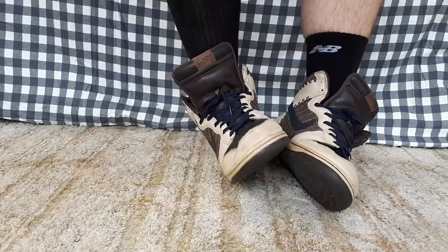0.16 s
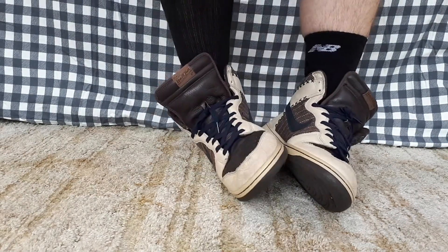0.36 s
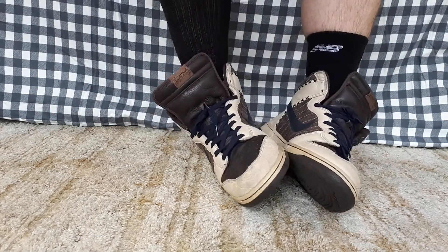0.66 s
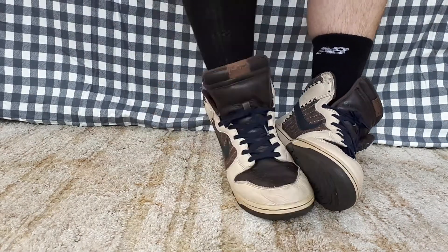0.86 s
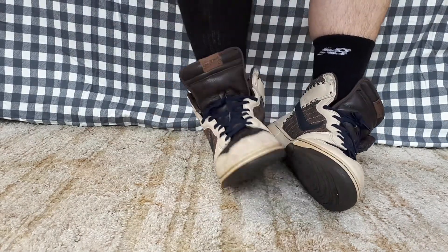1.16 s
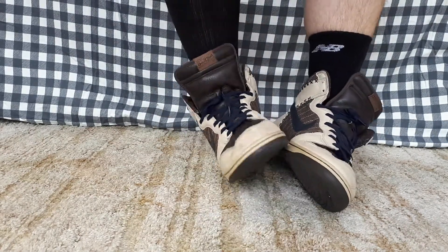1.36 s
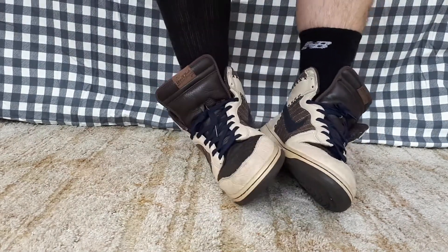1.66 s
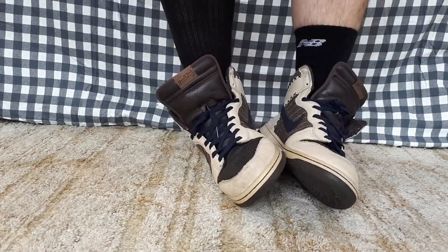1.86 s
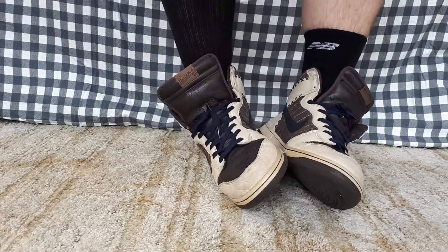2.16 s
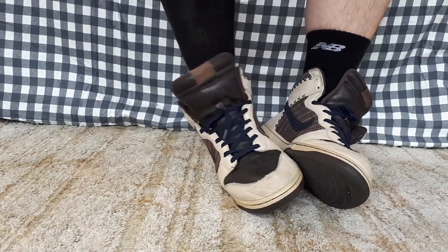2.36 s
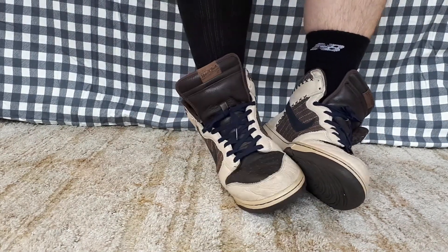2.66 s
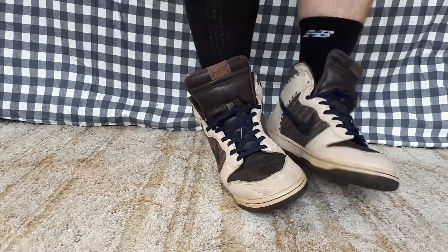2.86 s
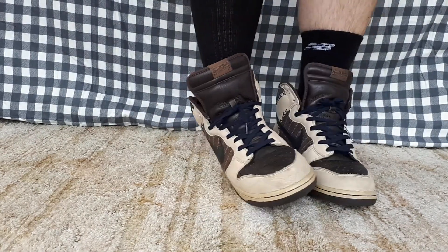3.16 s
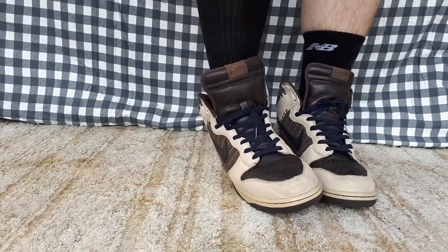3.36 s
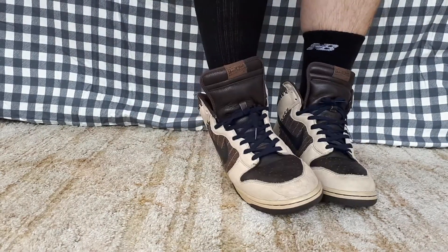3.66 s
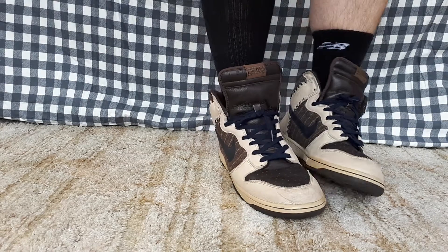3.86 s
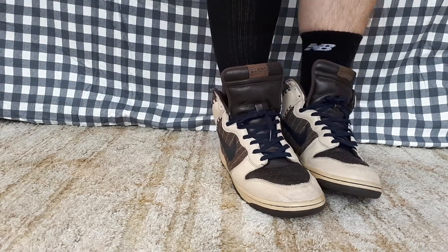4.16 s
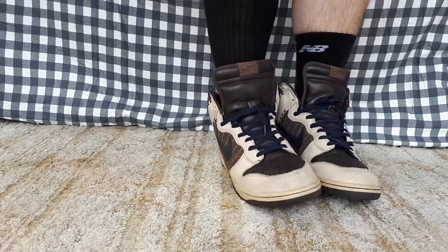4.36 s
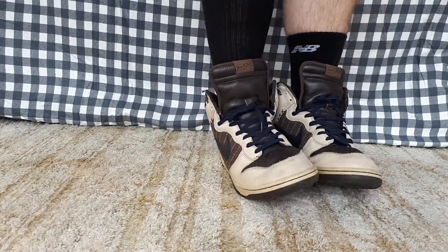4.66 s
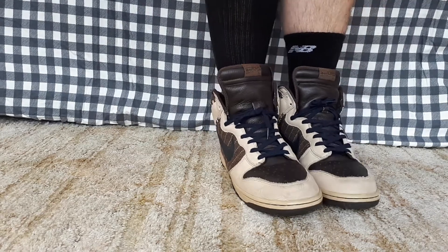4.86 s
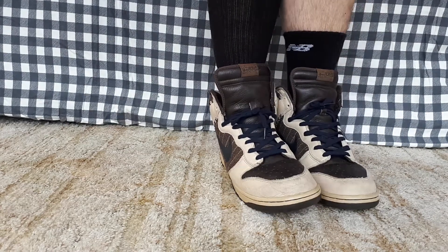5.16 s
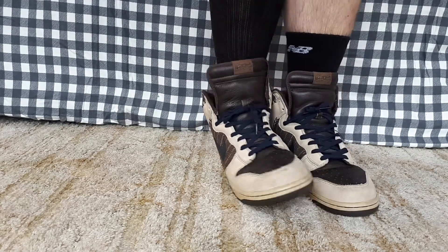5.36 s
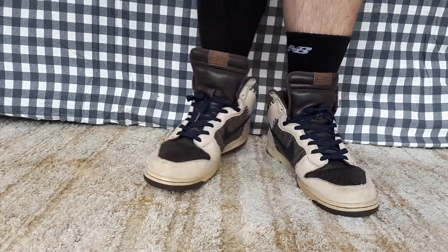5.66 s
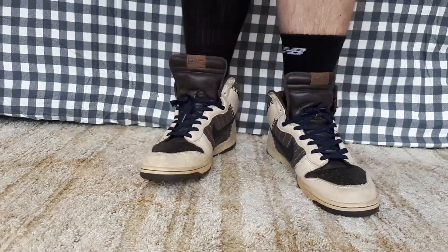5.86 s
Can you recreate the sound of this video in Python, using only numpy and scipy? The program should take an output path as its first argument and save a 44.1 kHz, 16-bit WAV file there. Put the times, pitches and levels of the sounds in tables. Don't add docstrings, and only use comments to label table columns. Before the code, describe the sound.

In a quiet small room with low hum and faint hiss, a soft toe tap on carpet comes first, then a loud hollow sneaker knock with a quick bounce. Faint taps and leather rubbing follow, then a second hard knock, a third duller cluster, and small taps. It ends with soft sole brushing. Close microphone, low by the floor, short room echo.

```python
import sys
import numpy as np
from scipy import signal
from scipy.fft import rfft, irfft
from scipy.io import wavfile
from scipy.ndimage import uniform_filter1d

SR = 44100
rng = np.random.default_rng(int(sys.argv[2]) if len(sys.argv) > 2 else 0)


def master(y):
    cut = np.clip(np.atleast_2d(y).T, -1, 1)
    pcm = np.round(cut * 32767)
    wavfile.write(sys.argv[1], SR, pcm.astype(np.int16))


def elevation(decibels):
    levels = np.asarray(decibels, float)
    return 10 ** (levels / 20)


N = 265430

# (frequency [Hz], density [dB per Hz])
HUM_COLOUR = [(15, -44), (25, -15.5), (84, -2), (117, -4), (206, -8), (277, -18.5), (416, -23.5),
              (734, -24), (840, -27.5), (1190, -29.5), (2220, -35), (2760, -37), (8830, -45),
              (14800, -39.5), (16000, -50)]
# (frequency [Hz], likeness [0-1])
HUM_LIKENESS = [(60, 0.8), (130, 0.96), (290, 0.71), (640, 0.5), (1410, 0), (3100, 0), (6820, -0.09),
                (15000, 0.14)]
# (time [s], level [dB])
RUMBLE_LEVEL = [(0.0, -59), (0.69, -60.5), (0.84, -48), (0.94, -57), (1.19, -58), (1.46, -60.5),
                (2.18, -61.5), (2.97, -61), (3.19, -59), (3.4, -62.5), (3.801, -60.5), (4.2, -61),
                (4.84, -59.5), (5.5, -62), (6.02, -61.5)]
HUM_DB = -59.5

# (time [s], length [s], pitch [Hz], level [dB])
COLLAR_GROANS = [
    (0.197, 0.1, 414.7, -63),
    (0.632, 0.11, 416, -64),
    (1.413, 0.064, 377, -71),
]

# (time of top speed [s], hiss [dB], rise [s], fall [s], finest fuzz [dB re hiss])
SOLE_STROKES = [(.252, -76.5, 0.059, 0.11, -6), (1.0, -76.5, 0.11, 0.24, -4.5),
                (1.138, -77.5, 0.1, 0.24, -11.5), (1.45, -79, .05, 0.22, -10), (1.53, -83, .1, .1, -9),
                (1.82, -84.5, 0.18, .3, -2.5), (2.81, -64, 0.031, 0.12, -6), (2.97, -77.5, .2, 0.22, -12),
                (3.224, -77.5, 0.26, .12, -8), (4.68, -73, 0.44, 0.27, -9), (4.84, -65, 0.31, 0.26, -17),
                (5.0, -72, 0.42, 0.05, -8), (5.2, -80, 0.28, 0.71, -5), (5.38, -75, 0.11, 0.12, -5),
                (5.476, -62.5, 0.098, 0.11, -13.5), (5.62, -81, 0.11, 0.34, -4.5),
                (5.958, -81, 0.31, .1, -8)]
# (time of peak [s], body rub [dB], rise [s], fall [s], leather [dB re rub])
FOOT_SHIFTS = [(.22, -64.5, 0.24, 0.12, -21), (.68, -66, 0.12, 0.29, -14), (1.14, -74.5, 0.083, 0.47, -3),
               (1.42, -66, 0.087, 0.12, -17), (1.64, -74.5, 0.06, .2, -14.5), (2.34, -72, 0.068, 0.063, -6),
               (2.56, -69, .1, .15, -24), (2.785, -63, .12, 0.2, -8.5), (3.0, -69.5, 0.11, 0.092, -1.5),
               (3.3, -64.5, 0.25, .15, -18), (3.65, -74.5, 0.18, .2, -15), (4.15, -67, 0.082, 0.17, -13),
               (4.41, -71, .1, 0.18, -9.5), (4.77, -64, 0.44, 0.26, -25), (4.95, -73, 0.41, 0.34, -4.5),
               (5.195, -71, .02, 0.019, -1.5), (5.48, -65.5, .1, 0.14, -6.5), (5.8, -72, 0.22, .2, -12)]
# (frequency [Hz], density [dB per Hz])
FIBRE_COLOUR = [(1500, -35), (2400, 6), (3500, 1), (6500, 0.5), (7700, 2.5), (8400, -54)]
FUZZ_COLOUR = [(7800, -30), (9000, -7), (13000, -3.5), (15500, -5.5), (17000, -22)]
LEATHER_COLOUR = [(600, -39.5), (950, -2.5), (1150, 2), (1320, 2.5), (1520, -4.5), (1750, -7.5),
                  (2100, -3.5), (2800, -28.5)]
BODY_COLOUR = [(180, -0.5), (300, -1), (500, -4.5), (800, -7), (1100, -37)]
FADE_DB, FADE_ROUNDNESS = 19.5, 1.4
LEATHER_DB, REST_HISS_DB, REST_RUB_DB = 0, -94, -81.5

# (time [s], level [dB], hold [s], bass T60 [s], treble T60 [s])
SETTLINGS = [
    (0.767, -30, 0.046, 0.3, 0.28),
    (2.372, -31, .015, 0.33, 0.28),
    (3.748, -34.5, 0.051, 0.21, 0.18),
    (4.291, -50, 0.044, 0.23, 0.49),
]
# (frequency [Hz], density [dB per Hz])
SETTLING_COLOURS = [
    [(21, -34.5), (70, 1), (200, -5), (520, -10), (1230, -18), (2590, -27.5), (5500, -38), (8430, -49)],
    [(28, -40.5), (70, 7), (450, -13), (1370, -11.5), (3100, -36), (6200, -44), (8430, -51), (16000, -58.5)],
    [(40, -30), (171, 6.5), (450, -10), (684, -9), (1090, -17.5), (1370, -15.5), (2500, -31.5),
     (16000, -48)],
    [(150, -13), (250, -7), (444, -4), (540, -15.5), (1240, -27), (1500, -49), (16000, -43.5)],
]
SETTLE_RISE_S, SETTLE_LATE_S = .0075, 0.0054

# (frequency [Hz], level [dB], T60 [s])
BOARD_MODES = [(77.9, -16.5, .2), (130.4, 4, 0.065), (188, -5, 0.057)]
# (frequency [Hz], level [dB])
CRACK_COLOUR = [(600, -25), (1200, -15.5), (1800, -1), (2400, 4), (3300, -4.5), (4800, -3), (6500, -8.5),
                (8200, -31.5), (12000, -25.5), (14500, -31), (16000, -34)]
# (time [s], sole peak [dB], sole pitch [Hz], floor boom [dB], edge crack [dB])
HARD_KNOCKS = [
    (0.7657, -5, 548, -22, -16.5),
    (0.7719, -16.5, 381.3, -37, -47),
    (0.8317, -24, 1026, -24, -20),
    (2.3711, -9.5, 592, -21.5, -30),
    (3.7456, -19, 317, -42, -34),
    (3.7522, -29.5, 270, -40.5, -57),
    (3.7844, -24.5, 318, -45, -64),
    (3.8055, -32, 484, -34, -67),
]
# (time [s], peak [dB], pitch [Hz])
RIM_HITS = [(0.766, -28, 1120), (2.3720, -23.5, 1250), (2.3735, -29, 1950), (2.3865, -28, 1260),
            (3.7465, -29, 677), (3.7459, -25.5, 1160), (3.786, -36.5, 1110), (3.793, -31, 1300),
            (.169, -54, 583), (1.389, -57, 750), (3.289, -55.5, 850), (4.137, -58, 843), (4.289, -43, 526),
            (4.2995, -35.5, 620), (4.372, -50, 840), (4.3030, -45.5, 920)]
# (time [s], sole peak [dB], sole pitch [Hz], floor boom [dB])
TOE_TAPS = [
    (0.1711, -44, 268, -37),
    (1.3884, -40.5, 385, -37.5),
    (2.7206, -49.5, 870, -45.5),
    (3.2898, -47.5, 395, -44.5),
    (4.138, -45, 427, -52),
    (4.2903, -40.5, 317, -50),
    (4.3732, -43.5, 430, -57),
]
# (time [s], peak [dB], pitch [Hz])
LEATHER_POPS = [
    (0.254, -53, 392),
    (1.456, -53.5, 367),
    (1.635, -60, 900),
    (2.7573, -46, 865),
    (4.79, -48.5, 253),
]
KNOCK_ROOM_DB, RIM_ROOM_DB, TAP_ROOM_DB, POP_ROOM_DB = -24.5, -24, -21, -12
RIM_BOOM_DB, POP_BOOM_DB = -31, -32
RIM_CRACK_DB, TAP_CRACK_DB, POP_CRACK_DB = -30, -19, -26
SWELL_TURNS, PITCH_SAG, BOOM_LAG_S = 1.05, .035, .0016
ROOM_T60_S, ROOM_GAP_S, PORT_LAG = 0.24, .006, 2


def on_log_axis(points, hz):
    at, value = np.transpose(points)
    return np.interp(np.log(np.maximum(hz, 1)), np.log(at), value)


def colour(x, points):
    size = x.shape[-1]
    return irfft(rfft(x) * elevation(on_log_axis(points, np.fft.rfftfreq(size, 1 / SR))), size)


def unit(x):
    return x / np.sqrt(np.mean(x ** 2))


def pair(size, likeness):
    like = np.clip(on_log_axis(likeness, np.fft.rfftfreq(size, 1 / SR)), 0, 1)
    mid, side = rfft(rng.standard_normal((2, size)))
    return irfft(np.sqrt(1 + like) * mid + np.sqrt(1 - like) * side * np.array([[1], [-1]]), size)


def walk(rate):
    hold = int(SR / rate)
    steps = np.repeat(rng.standard_normal(N // hold + 1), hold)
    return 1.3 * uniform_filter1d(uniform_filter1d(steps, hold), hold)[:N]


def add(track, sound, s):
    at = int(round(s * SR))
    track[..., at:at + sound.shape[-1]] += sound[..., :N - at]


def room_tone(flicker_db=2.03):
    tone = elevation(HUM_DB) * unit(colour(pair(N, HUM_LIKENESS), HUM_COLOUR))
    rumble = colour(tone, [(260, 0.5), (500, -30.0)])
    s, level_db = np.transpose(RUMBLE_LEVEL)
    weight = elevation(np.interp(np.arange(N) / SR, s, level_db) + flicker_db * walk(36))
    return unit(rumble) * weight + tone - rumble


def groans(rough=0.041):
    out = np.zeros(N)
    for s, length_s, hz, level_db in COLLAR_GROANS:
        size = int(length_s * SR)
        phase = 2 * np.pi * np.cumsum(hz * (1 + rough * walk(117)[:size])) / SR
        level = elevation(level_db + 2.5 * walk(80)[:size])
        add(out, level * np.sqrt(np.hanning(size)) * np.sin(phase), s)
    return out


def swells(moves):
    t = np.arange(0, N + 64, 64) / SR
    s, level_db, rise_s, fall_s, second_db = np.transpose(moves)[:, :, None]
    away = np.maximum((s - t) / rise_s, (t - s) / fall_s)
    gain = elevation(level_db - FADE_DB * away ** FADE_ROUNDNESS)
    both = [np.sqrt(np.sum(g ** 2, axis=0)) for g in (gain, gain * elevation(second_db))]
    return [np.interp(np.arange(N) / SR, t, g) for g in both]


def brushing(grain_db=1.5, patchy_db=0.5):
    grain = elevation(grain_db * np.repeat(rng.exponential(size=N // 32 + 1), 32)[:N])
    fibre = unit(colour(grain * pair(N, [(1000, .4), (3000, 0.0044)]), FIBRE_COLOUR))
    fibre = fibre * elevation(patchy_db * walk(25.28))
    leather = unit(colour(pair(N, [(600, .6), (2000, 0.56)]), LEATHER_COLOUR)) * elevation(patchy_db * walk(16))
    body = unit(colour(pair(N, [(300, 0.6), (800, 0.4)]), BODY_COLOUR)) * elevation(patchy_db * walk(6.9))
    fuzz = unit(colour(grain * pair(N, [(1000, 0), (3000, 0.0053)]), FUZZ_COLOUR))
    hiss, finest = swells(SOLE_STROKES)
    rub, creak = swells(FOOT_SHIFTS)
    sliding = np.hypot(hiss, elevation(REST_HISS_DB)) * fibre + finest * fuzz
    upper = np.hypot(elevation(LEATHER_DB) * hiss, creak) * leather
    return sliding + upper + np.hypot(rub, elevation(REST_RUB_DB)) * body


def settling(lumps_db=2.5):
    out, t = np.zeros((2, N)), np.arange(SR) / SR
    for (s, level_db, hold_s, bass_t60, treble_t60), points in zip(SETTLINGS, SETTLING_COLOURS):
        noise = pair(SR, [(200, 0.96), (600, 0.69), (1100, 0.083), (4000, 0.24)])
        rustle = unit(colour(noise, points))
        bass = colour(rustle, [(500, -1.5), (1400, -32.5)])
        after = np.hypot(np.maximum(t - hold_s, 0), t / 4)
        body = bass * elevation(-60 * after / bass_t60) * (1 - np.exp(-t / SETTLE_RISE_S))
        late = 1 - np.exp(-(t / SETTLE_LATE_S) ** 2)
        hiss = (rustle - bass) * elevation(-60 * after / treble_t60) * late
        add(out, elevation(level_db) * (body + hiss * elevation(lumps_db * walk(160)[:SR])), s)
    return out


def contacts():
    rows = [(*knock, KNOCK_ROOM_DB) for knock in HARD_KNOCKS]
    rows += [(s, db, hz, db + RIM_BOOM_DB, db + RIM_CRACK_DB, RIM_ROOM_DB) for s, db, hz in RIM_HITS]
    rows += [(s, db, hz, boom_db, db + TAP_CRACK_DB, TAP_ROOM_DB) for s, db, hz, boom_db in TOE_TAPS]
    rows += [(s, db, hz, db + POP_BOOM_DB, db + POP_CRACK_DB, POP_ROOM_DB) for s, db, hz in LEATHER_POPS]
    return sorted(rows)


def blow(sole_db, sole_hz, boom_db, crack_db, grit, crack_s=0.0025):
    t = np.arange(SR // 4) / SR
    swell = t * sole_hz / SWELL_TURNS
    cycles = np.log(1 + PITCH_SAG * sole_hz * t) / PITCH_SAG
    sole = np.sqrt(swell * np.exp((1 - swell ** 3) / 3)) * np.sin(2 * np.pi * cycles)
    hollow = swell / (1 + swell) * np.exp(-swell / 5.47)
    sole += elevation(-19.5) * hollow * np.sin(2 * np.pi * 0.92 * sole_hz * t)
    boards = sum(elevation(db - 60 * t / t60) * np.sin(2 * np.pi * hz * t) for hz, db, t60 in BOARD_MODES)
    boards = (1 - np.exp(-t / .002)) * boards * (t < t[-1] - BOOM_LAG_S)
    boom = -np.roll(boards, int(BOOM_LAG_S * SR))
    snap = colour(signal.unit_impulse(len(t), idx=SR // 1000), CRACK_COLOUR) * (t < t[-1] / 2)
    grit_swell = t / crack_s * np.exp(1 - t / crack_s) ** 2 / np.e
    crack = snap / np.abs(snap).max() + elevation(-12.5) * grit * grit_swell
    return elevation(sole_db) * sole + elevation(boom_db) * boom + elevation(crack_db) * crack


def wall_echo():
    t = np.arange(SR // 2) / SR
    echo = pair(len(t), [(300, 0.83), (800, 0.547), (2000, .4)])
    echo = echo * elevation(-60 * t / ROOM_T60_S) * (1 - np.exp(-t / 0.0073))
    return echo / np.sqrt(len(t)) / np.std(echo) * elevation(11.5)


def blows():
    near, walls = np.zeros(N), np.zeros(N)
    rows = contacts()
    grit = colour(rng.standard_normal((len(rows), SR // 4)), CRACK_COLOUR)
    for (s, sole_db, sole_hz, boom_db, crack_db, room_db), chips in zip(rows, grit):
        knock = blow(sole_db, sole_hz, boom_db, crack_db, unit(chips))
        add(near, knock, s)
        add(walls, elevation(room_db) * knock, s + ROOM_GAP_S)
    near = colour(near, [(30, -20.0), (65, -0.5)])
    low = colour(near, [(6000, 2.0), (10000, -29)])
    direct = np.array([np.roll(low, shift=PORT_LAG), low]) + near - low
    return direct + signal.fftconvolve(walls[None], wall_echo(), axes=1)[:, :N]


def scene():
    return room_tone() + groans() + brushing() + settling() + blows()


def low_pass(x):
    return signal.sosfilt(signal.butter(12, 16480, fs=SR, output="sos"), x)


def record(dry):
    cut = signal.sosfilt(signal.ellip(8, .2, 70, 15750, fs=SR, output="sos"), dry)
    cut = signal.sosfilt(signal.butter(2, 36, "high", fs=SR, output="sos"), cut)
    return low_pass(cut)


dry = scene()
out = record(dry)
master(out)
```